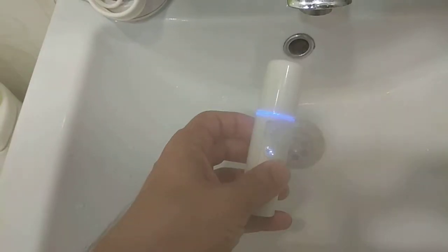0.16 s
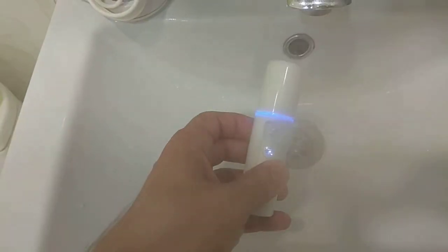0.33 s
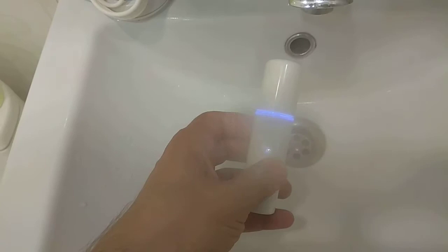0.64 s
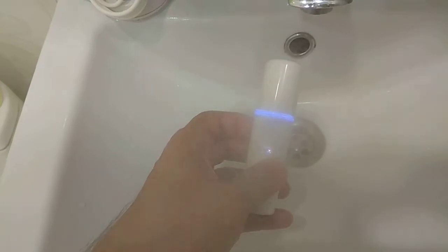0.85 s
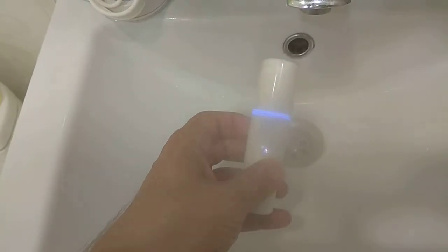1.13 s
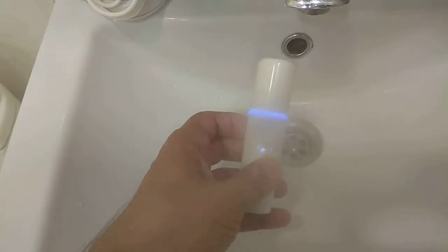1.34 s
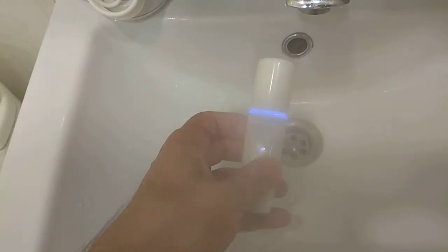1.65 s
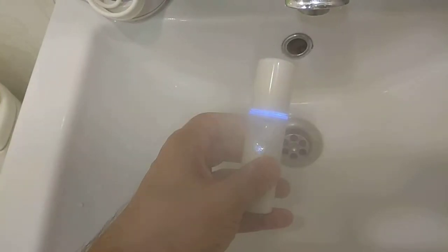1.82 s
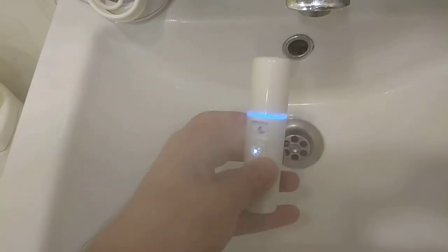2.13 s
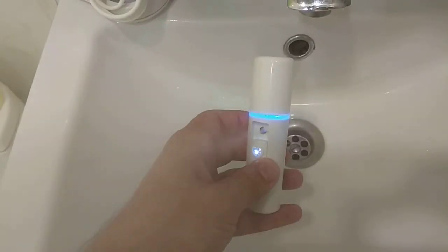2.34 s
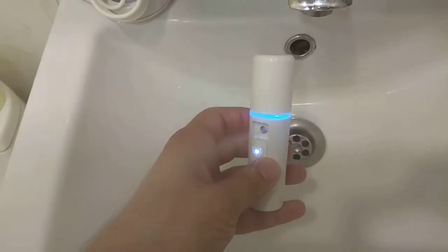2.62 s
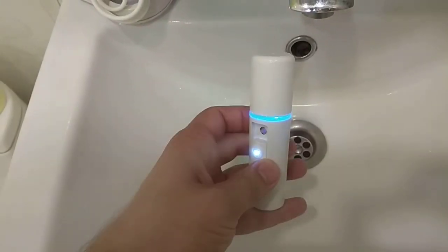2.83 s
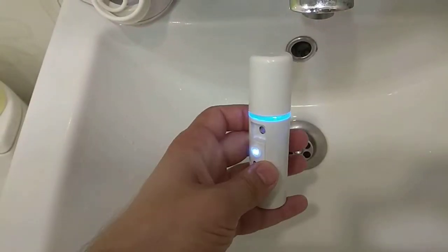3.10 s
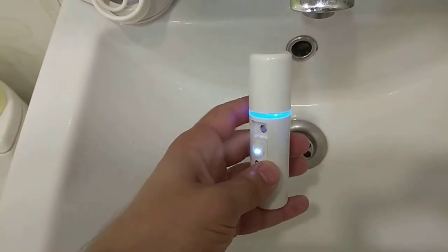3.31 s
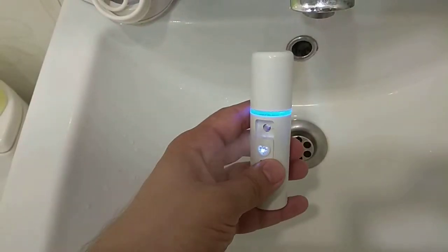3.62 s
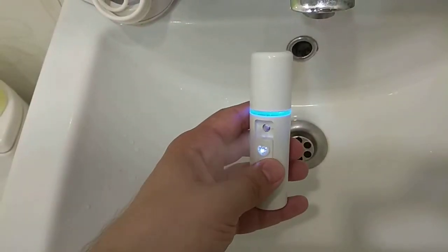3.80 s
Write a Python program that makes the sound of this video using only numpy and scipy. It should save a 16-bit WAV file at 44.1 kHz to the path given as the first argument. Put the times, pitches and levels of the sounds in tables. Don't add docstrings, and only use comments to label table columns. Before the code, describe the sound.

Steady high-pitched fizzing spray from a small mister, close and quiet in stereo, coloured by short sink echoes; soft left-side handling bumps come early and again past the middle, above a faint low fan hum.

```python
import sys
import numpy as np
from scipy import signal
from scipy.io import wavfile

SR = 44100
rng = np.random.default_rng(int(sys.argv[2]) if len(sys.argv) > 2 else 0)


def boost_factor(decibels):
    exponent = np.asarray(decibels, float) / 20
    return 10 ** exponent


def generate_wav(sig):
    pcm = np.round(np.clip(np.atleast_2d(sig).T, -1, 1) * 32767).astype(np.int16)
    wavfile.write(sys.argv[1], SR, pcm)


N = 174636

FRAME, HOP = 1024, 256
HZ = np.arange(FRAME // 2 + 1)[:, None] * SR / FRAME + 1e-3
ROWS = np.arange(len(HZ))


def rms_one(x):
    return x / np.sqrt(np.mean(np.abs(x) ** 2) + 1e-20)


def white(count):
    return signal.stft(rng.standard_normal((count, N)), nperseg=FRAME, noverlap=FRAME - HOP)[2]


def sound(spectra):
    return signal.istft(spectra, nperseg=FRAME, noverlap=FRAME - HOP)[1][..., :N]


def frame_times(count):
    return np.arange(count) * HOP / SR


def in_time(rows, count):
    s, *columns = np.transpose(rows)
    return [np.interp(frame_times(count), s, column) for column in columns]


def at_hz(points, column=1):
    points = np.array(points)
    return np.interp(np.log(HZ), np.log(points[:, 0]), points[:, column])


def shaped(points):
    power = boost_factor(at_hz(points)) ** 2
    return power / power.mean()


def lobe(hz, width_hz):
    bell = np.exp(-.5 * ((HZ - hz) / width_hz) ** 2)
    return bell * SR / 2 / (width_hz * np.sqrt(2 * np.pi))


def drift(rate_hz, rows, count):
    r = np.exp(-2 * np.pi * rate_hz * HOP / SR)
    chance = rng.standard_normal((rows, count + 500))
    return rms_one(signal.lfilter([1], [1, -2 * r, r * r], chance)[:, 500:])


def likeness(count):
    # pitch_hz [Hz], common_share [0-1]
    common_share = [(3000, .3), (5500, .3), (7500, .68)]
    # pitch_hz [Hz], width_hz [Hz], then four shares [0-1] at the moments below
    alike_bands = [(3850, 150, .5, .6, .5, .6), (6000, 280, .995, .99, .5, .8), (6950, 200, .8, .7, .5, .5),
                   (11700, 250, .5, .9, .9, .5), (12600, 800, .985, .88, .75, .5),
                   (15300, 500, .5, .6, .7, .92)]
    moments_s = [0, 1.95, 2.03, 3.0]
    share = at_hz(common_share)
    for hz, width_hz, *shares in alike_bands:
        strength = np.interp(frame_times(count), moments_s, shares)
        share = np.maximum(share, strength * np.exp(-.5 * ((HZ - hz) / width_hz) ** 4))
    return np.clip(share, 0, 1)


def null(rows, width_hz, count):
    hz, depth = in_time(rows, count)
    shake, fill = drift(8.7, rows=2, count=count)
    offset = (HZ - hz - 0.32 * width_hz * shake) / width_hz
    return 1 - np.clip(depth * (1 + 0.1 * fill), 0, 1) * np.exp(-.5 * offset ** 2)


def reflections(count):
    # start_s [s], pitch_hz [Hz], depth [0-1]
    floor_null = [(0.0, 6900, .9), (2.28, 6950, .9), (2.36, 6900, .3), (2.42, 5850, .3), (2.5, 5800, .85),
                  (3.35, 5800, .8), (3.5, 6250, .6), (3.96, 6300, .6)]
    # start_s [s], pitch_hz [Hz], depth [0-1]
    wall_null = [(0.0, 11900, .3), (0.4, 10700, .7), (1.0, 9400, .8), (1.44, 7900, .8), (1.5, 7900, 0),
                 (1.6, 11500, 0), (1.9, 11600, .75), (3.0, 11700, .6), (3.96, 11800, .2)]
    return null(floor_null, 140, count) * null(wall_null, 182, count)


def basin(count):
    echo_gain, shortest_s, longest_s = boost_factor(-4), .0008, .011
    sway_s, sway_hz = .00003, .6
    delays = np.exp(rng.uniform(np.log(shortest_s), np.log(longest_s), (18, 1)))
    delays = delays + sway_s * drift(sway_hz, rows=18, count=count)
    echoes = np.exp(-2j * np.pi * HZ * delays[:, None, :])
    echoes = echoes.reshape(3, 6, len(HZ), count).sum(axis=1)
    return np.abs(1 + echo_gain * echoes) / np.sqrt(1 + 6 * echo_gain ** 2)


def flecked(spectra):
    # pitch_hz [Hz], rarity [spreads above the mean]
    fleck_rarity = [(500, 1.9), (1200, 1.3), (2600, .7), (6500, .6), (7500, 1.5), (9000, 2.4), (10800, 1.7),
                    (11800, .9), (13900, .9), (14400, 2.6)]
    flicker_hz, depth_db, rows_each = 8, -26, 3
    chance = drift(flicker_hz, rows=len(HZ) // rows_each + 1, count=spectra.shape[-1])
    chance = chance[ROWS // rows_each]
    gain = boost_factor(depth_db * np.clip(2 * (chance - at_hz(fleck_rarity)) + .5, 0, 1))
    return spectra * gain / np.sqrt(np.mean(gain ** 2, axis=1, keepdims=True))


def phase_lead(share):
    # pitch_hz [Hz], right_lead [radians]
    port_lead = [(2600, 0.2), (3800, 2.6), (5000, 1.7), (5700, 3.14), (7200, 3.2), (10000, 6.0),
                 (11900, 9.3), (13400, 9.55), (14300, 12.4)]
    count = share.shape[1]
    wobble = .16 * HZ / 6100.0 * drift(3, rows=1, count=count)
    scatter = drift(2.5, rows=64, count=count)[ROWS * 64 // len(HZ)]
    return at_hz(port_lead) + wobble + 1.8 * (1 - share) * scatter


def sputter(count):
    patches = drift(1.0, rows=48, count=count)[ROWS * 48 // len(HZ)]
    return boost_factor(0.6 * drift(13, rows=1, count=count) + 0.4 * patches)


def mister():
    # start_s [s], level_db [dB], pitch_hz [Hz], left_right_db [dB]
    jet_aim = [(0.0, -58, 8000, -3), (0.14, -63, 7500, 8), (0.25, -55, 9030, -15), (0.74, -53, 8960, -10),
               (0.78, -50.5, 8470, -2), (1.02, -59, 8700, -16), (1.09, -57.5, 8300, 4),
               (1.28, -61, 8300, 1), (1.45, -60.5, 9300, -9), (1.51, -46, 8700, -4.5),
               (1.75, -43.5, 8440, -3.5), (2.15, -45.5, 8310, -5.5), (2.29, -47.5, 8370, -3.5),
               (2.36, -50, 8200, -3), (2.6, -49.5, 8100, -2), (3.0, -56.5, 8260, -3),
               (3.7, -60.5, 8950, -3), (3.96, -59.5, 8800, -13)]
    # start_s [s], level_db [dB], left_right_db [dB]
    bowl_return = [(0.0, -61, -13), (0.16, -51, -14.5), (0.5, -69, -16), (0.53, -52.5, -13),
                   (0.83, -58.5, -18), (0.86, -63, -3), (1.11, -59, -16), (1.66, -57.5, -23),
                   (1.94, -60, -7), (2.04, -54.5, -10), (2.43, -54.5, -4.5), (2.47, -52, -7),
                   (2.89, -56, -1.5), (3.96, -54, -3.5)]
    # pitch_hz [Hz], level_db [dB per Hz]
    mist_colour = [(2200, -39.5), (3100, -24), (4600, -16), (6800, -10), (7600, -2), (12800, -6.5),
                   (14200, -2), (15600, -1)]
    # pitch_hz [Hz], strength [0-1]
    echo_colour = [(6500, .3), (8000, .75), (11000, .5)]
    common, left, right = white(count=3)
    count = common.shape[1]
    beam_db, beam_hz, beam_pan = in_time(jet_aim, count)
    bowl_db, bowl_pan = in_time(bowl_return, count)
    swing = beam_db - beam_db.mean()
    share = likeness(count)
    lead = phase_lead(share)
    both, *echoes = basin(count)
    colour = sputter(count) * reflections(count) * both ** at_hz(echo_colour)
    mist = boost_factor(-47 + 0.1 * swing) ** 2 * shaped([(1000, -104)] + mist_colour)
    rim_db = -58 - 0.56 * swing
    ports = []
    for side, own, echo in zip((1, -1), (left, right), echoes):
        beam = boost_factor(beam_db + side * beam_pan / 2) ** 2 * lobe(beam_hz - side * 290 / 2, 466)
        bowl = boost_factor(bowl_db + side * bowl_pan / 2) ** 2 * lobe(9990, 340)
        rim = boost_factor(rim_db + side * -2 / 2) ** 2 * lobe(11560, 500)
        shared_wave = np.sqrt(share) * np.exp(-.5j * side * lead) * common
        own_wave = np.sqrt(1 - share) * np.sqrt(echo) * own
        ports.append(np.sqrt(2 * (beam + bowl + rim + mist)) * colour * (shared_wave + own_wave))
    return sound(flecked(np.array(ports)))


def draught():
    # start_s [s], level_db [dB]
    rush = [(0.0, -105), (0.14, -87.5), (0.43, -76.5), (0.68, -89.5), (1.23, -102), (1.4, -87), (1.58, -82),
            (2.03, -77.5), (2.51, -86), (3.07, -80), (3.64, -90.5), (3.96, -85.5)]
    noise = white(count=2)
    rush_db = in_time(rush, noise.shape[2])[0]
    return sound(noise * np.sqrt(2 * lobe(444, 236)) * boost_factor(rush_db))


def fan_hum():
    hum_hz, width_hz = 200, 9
    r = np.exp(-np.pi * width_hz / SR)
    ring = [1, -2 * r * np.cos(2 * np.pi * hum_hz / SR), r * r]
    return boost_factor(-75.5) * rms_one(signal.lfilter([1, 0, -1], ring, rng.standard_normal(N)))


def bathroom():
    # pitch_hz [Hz], level_db [dB per Hz]
    room_colour = [(24, -52), (40, -42.5), (193, 0), (270, -16.5), (490, -30), (900, -22.5), (2300, -27),
                   (3200, -38.5)]
    alike = .05
    common, left, right = white(count=3)
    air = np.sqrt(alike) * common + np.sqrt(1 - alike) * np.array([left, right])
    air = air * np.sqrt(shaped(room_colour))
    patches = drift(3.95, rows=len(HZ) // 4 + 1, count=common.shape[1])[ROWS // 4]
    air = air * boost_factor(4 * patches * (HZ > 350))
    return boost_factor(-75.5) * rms_one(sound(flecked(air))) + fan_hum()


def bump(hz):
    cycles = np.arange(-600, 1200) / SR * hz
    sag = 1 - 0.12 * np.clip(cycles, -2, 2)
    length = np.where(cycles < 0, 0.35, 0.75)
    return -np.cos(2 * np.pi * cycles * sag) * np.exp(-.5 * (cycles / length) ** 2)


def fidgets():
    happens = rng.random(N) < 45 / SR
    push = boost_factor(-65.5 + 1.6 * rng.standard_normal(N)) * rng.choice([-1, 1], N)
    return signal.fftconvolve(happens * push, bump(140), "same")


def fingers():
    # start_s [s], level_db [peak dB], pitch_hz [Hz]
    soft_bumps = [(0.16, -41.5, 178), (0.258, -46, 245), (0.288, -55, 239), (0.428, -37.5, 233),
                  (0.864, -57, 153), (1.289, -71, 149), (1.419, -47, 180), (1.546, -55.5, 195),
                  (2.148, -57, 150), (2.164, -45.5, 274), (2.176, -52, 180), (2.28, -59, 168),
                  (2.372, -61, 146), (2.459, -54, 150), (2.526, -52.5, 181), (2.543, -53, 150),
                  (2.572, -43, 199), (2.588, -54, 140), (2.726, -47, 190), (2.747, -56.5, 143),
                  (2.852, -38, 237), (2.87, -43.5, 250), (2.899, -59, 179), (3.814, -52.5, 158)]
    # start_s [s], level_db [peak dB]
    nail_snaps = [
        (.254, -56),
        (.425, -52.5),
        (2.868, -55),
    ]
    tick_ahead_s, tick_hz, snap_hz = 0.00296, 540, 1250
    touch = np.zeros(N + 2400)
    for s, db, hz in soft_bumps:
        i = int(s * SR)
        touch[i:i + 1800] += boost_factor(db) * bump(hz)
        i -= int(tick_ahead_s * SR)
        tick_db = db - 11.5 + 0.18 * (hz - 235.5)
        touch[i:i + 1800] += boost_factor(tick_db) * bump(tick_hz)
    for s, db in nail_snaps:
        i = int(s * SR)
        touch[i:i + 1800] += boost_factor(db) * bump(snap_hz)
    return (touch[600:N + 600] + fidgets()) * [[1], [boost_factor(-66)]]


def scene():
    return mister() + draught() + bathroom() + fingers()


def top_cut(x):
    return signal.sosfilt(signal.butter(12, 16800, fs=SR, output="sos"), x)


def record(dry):
    steep = signal.ellip(14, .3, 70, 15720, fs=SR, output="sos")
    mix = signal.sosfilt(steep, dry)
    return top_cut(mix)


dry = scene()
out = record(dry)
generate_wav(out)
```